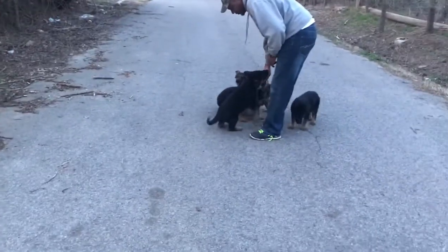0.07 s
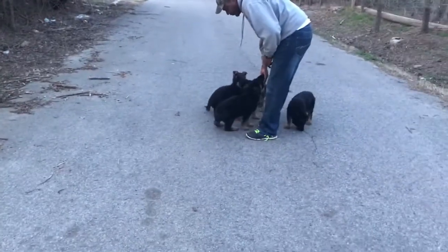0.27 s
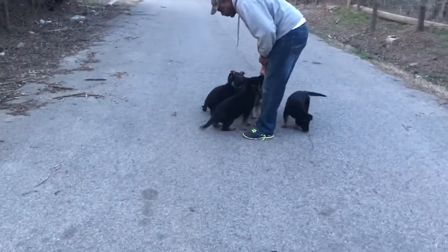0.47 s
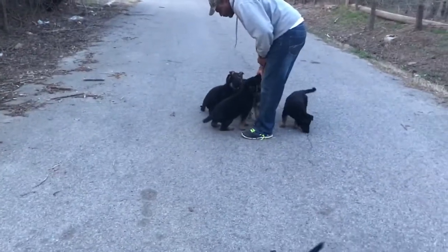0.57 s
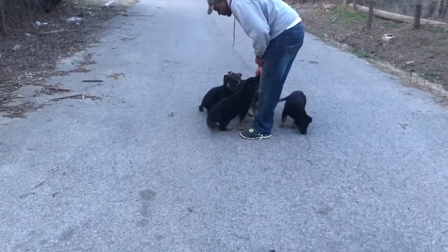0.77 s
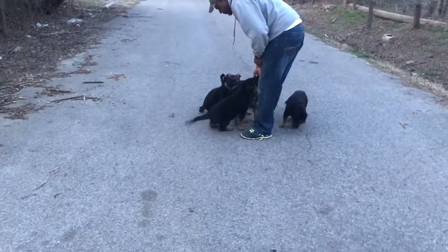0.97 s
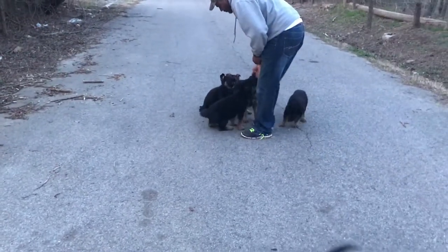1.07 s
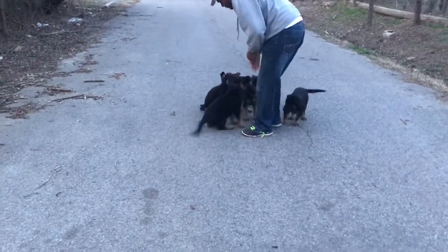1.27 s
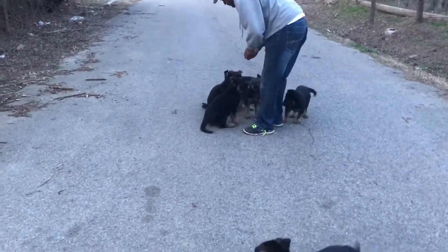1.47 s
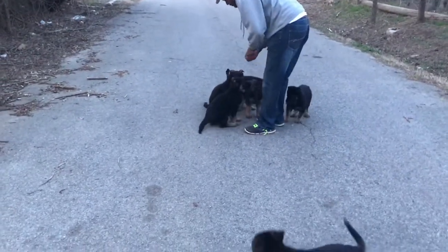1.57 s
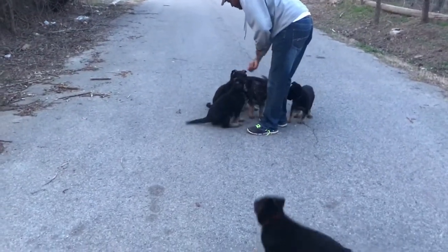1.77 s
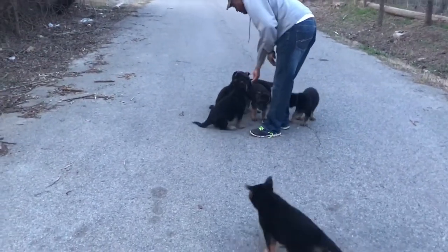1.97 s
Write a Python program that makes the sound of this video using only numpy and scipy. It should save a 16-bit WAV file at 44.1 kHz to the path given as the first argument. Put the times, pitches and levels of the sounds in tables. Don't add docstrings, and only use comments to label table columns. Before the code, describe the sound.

Short rising puppy yips and rough breathy huffs outdoors, claws ticking on asphalt over faint distant rumble

```python
import sys
import numpy as np
from scipy import signal
from scipy.io import wavfile
from scipy.ndimage import uniform_filter1d

SR = 44100
rng = np.random.default_rng(int(sys.argv[2]) if len(sys.argv) > 2 else 0)


def persist_wave(psi):
    counts = np.round(np.clip(psi, -1, 1) * 32767).astype(np.int16)
    wavfile.write(sys.argv[1], SR, np.atleast_2d(counts).T)


def gain_from_decibels(decibels):
    exponent = np.asarray(decibels, float) / 20
    return 10 ** exponent


N = 88993
PITCH_WOBBLE = .006


def rms_one(x):
    return x / np.sqrt(np.mean(x ** 2) + 1e-20)


def at_hz(points, hz):
    p = np.array(points)
    return np.interp(np.log(hz), np.log(p[:, 0]), p[:, 1])


def drift(rate_hz):
    r = np.exp(-2 * np.pi * rate_hz / SR)
    wander = signal.lfilter([1], [1, -2 * r, r * r], rng.standard_normal(N + SR))
    return rms_one(wander[SR:])


def resonate(x, hz, width_hz):
    r = np.exp(-np.pi * width_hz / SR)
    top = np.array([1, 0, -1]) * (1 - r * r) / 2
    bottom = [1, -2 * r * np.cos(2 * np.pi * hz / SR), r * r]
    return signal.lfilter(top, bottom, x + 1e-18)


def band(x, low_hz, high_hz, order=2):
    return signal.sosfilt(signal.butter(order, [low_hz, high_hz], "band", fs=SR, output="sos"), x)


def ramp(u):
    return np.sin(np.pi / 2 * np.clip(u, 0, 1)) ** 2


def gate(start, length, attack, release):
    t = np.arange(N) / SR - start
    return ramp(t / attack) * ramp((length - t) / release)


def coloured(points, patchy_db):
    edges = np.geomspace(points[0][0], min(points[-1][0], .45 * SR), 14)
    white = rng.standard_normal((2, N + SR))
    total = np.zeros(N)
    for k, (low_hz, high_hz) in enumerate(zip(edges, edges[1:])):
        level_db = at_hz(points, np.sqrt(low_hz * high_hz)) + patchy_db * drift(6.1)
        total += gain_from_decibels(level_db) * band(white[k % 2], low_hz, high_hz)[SR:]
    return rms_one(total)


def distant_floor():
    # f/Hz, level/dB
    rumble_points = [(18, -28), (30, -2), (76, -1), (202, -10.5), (309, -14.5), (607, -13), (724, -10.5),
                     (1000, -13), (1300, -38), (2200, -120)]
    # f/Hz, level/dB
    murmur_points = [(590, -6), (1000, 1), (1520, 3.5), (1850, -3), (2410, -10), (3340, -24.5), (4110, -20),
                     (4840, -24.5), (16000, -50)]
    rumble = gain_from_decibels(-46) * coloured(rumble_points, patchy_db=1.06)
    murmur = gain_from_decibels(-52.5) * coloured(murmur_points, patchy_db=1.7)
    return rumble + murmur


def leaves():
    hiss = rms_one(resonate(rng.standard_normal(N), 14000, 2800))
    return gain_from_decibels(-74.5 + 0.73 * drift(25.0)) * hiss


def trees(x):
    echo_s, echo_db = .09, -17
    tail_t60_s, tail_db = .55, -9
    t = np.arange(SR) / SR
    tail = rng.standard_normal(SR) * gain_from_decibels(-60 * t / tail_t60_s) * ramp(t / 0.1)
    tail = gain_from_decibels(tail_db) * tail / np.sqrt(np.sum(tail ** 2))
    tail[int(echo_s * SR)] += gain_from_decibels(echo_db)
    dull = resonate(resonate(tail, 1000, 800), 1000, 1600)
    bright = gain_from_decibels(-4.0) * resonate(tail, 5000, 4000)
    return signal.fftconvolve(x, dull + bright)[:N]


def paw_scuffs():
    # start t/s, length/s, level/dB
    scuff_table = [(0.028, .04, -67), (0.342, 0.036, -58), (0.46, 0.01, -54.5), (1.034, 0.058, -69),
                   (1.13, 0.08, -62.5), (1.28, .015, -65), (1.318, 0.041, -64), (1.463, .035, -65),
                   (1.482, 0.054, -60.5), (1.528, 0.019, -63), (1.76, 0.067, -74), (1.833, 0.16, -69)]
    rough = rng.standard_normal(N) * gain_from_decibels(3 * drift(150))
    grit = rms_one(resonate(rough, 16000, 3600))
    swells = sum(gain_from_decibels(db) * gate(s, length, length / 2, length / 2) for s, length, db in scuff_table)
    return grit * swells


def claw_ticks():
    # t/s, peak level/dB, lower edge f/Hz, upper edge f/Hz
    tick_table = [(.111, -55, 11000, 14500), (.221, -43, 8200, 15100), (.248, -48, 8200, 14700),
                  (0.422, -50.5, 3070, 15000), (.941, -50, 3420, 14000), (.962, -48.5, 4130, 6960),
                  (1.384, -50, 3300, 14000), (1.431, -53, 11200, 15900), (1.587, -61, 4000, 5200),
                  (1.683, -57, 7820, 16100), (1.713, -56.5, 3750, 4450), (1.716, -52.5, 7700, 15000),
                  (1.772, -56, 10000, 15500), (1.975, -56, 9800, 15700)]
    tick_t60_s = 0.014
    out, t = np.zeros(N + 600), np.arange(600) / SR
    for s, db, low_hz, high_hz in tick_table:
        i = int(s * SR)
        burst = rng.standard_normal(600) * gain_from_decibels(-60 * t / tick_t60_s)
        burst = band(burst, low_hz, high_hz)
        out[i:i + 600] += gain_from_decibels(db) * burst / np.abs(burst).max()
    return out[:N]


def huffs():
    # start t/s, length/s, pulse rate f/Hz, voice level/dB, snort level/dB
    huff_table = [
        (-.07, 0.19, 170, -41.5, -60.5),
        (0.237, 0.11, 172, -32, -59),
        (0.616, 0.14, 170, -32, -51),
    ]
    # f/Hz, width/Hz, level/dB
    chest = [(340, 60, -16), (522, 60, 0), (670, 150, -1), (1020, 220, -12), (1350, 220, -12),
             (1680, 220, -11), (2050, 300, -19)]
    # f/Hz, width/Hz, level/dB
    nose = [(2320, 790, 0), (4320, 1220, -2.2), (6260, 1250, -10.5), (8500, 1900, -20.5), (14600, 4500, -7)]
    near_lift = [-22, -8.5, 5.4]
    open_lift = [13.5, 0.5, 0.5]
    attack_s, release_s, upper_lag_s = .05, .035, .04
    jitter, hoarse = .09, .7
    lead_s, lag_s, edge_s = 0.032, 0.091, 0.06
    out, air = np.zeros(N), rng.standard_normal((2, N))
    for huff, near_db, open_db in zip(huff_table, near_lift, open_lift):
        start, length, hz, voice_db, snort_db = huff
        cycle = np.cumsum(hz * (1 + jitter * drift(70.0))) / SR
        pulses = rms_one(np.diff(np.floor(cycle), prepend=0) * gain_from_decibels(1.6 * drift(130.0)))
        puffs = air[0] * (1 + np.cos(2 * np.pi * cycle))
        source = (1 - hoarse) * pulses + hoarse * puffs

        voice = np.zeros(N)
        for k, (f, w, d) in enumerate(chest):
            ring = resonate(resonate(source, f, 1.1 * w), f, 0.93 * w) / np.sqrt(w)
            swell = gate(start, length + upper_lag_s * np.log2(f / 600), attack_s, release_s * f / 600)
            voice += (-1) ** k * gain_from_decibels(d + open_db * (f > 800)) * ring * swell
        out += gain_from_decibels(voice_db) * rms_one(voice) * np.sqrt(length * SR / N)

        snort = np.zeros(N)
        for k, (f, w, d) in enumerate(nose):
            hiss = rms_one(resonate(resonate(air[1], f, 1.08 * w), f, 1.47 * w))
            snort += (-1) ** k * gain_from_decibels(d + near_db * (f > 8000)) * hiss
        swell = gate(start - lead_s, length + lead_s + lag_s, edge_s, 2.85 * edge_s)
        out += gain_from_decibels(snort_db + 1.5 * drift(44.0)) * snort * swell
    return out


def whine():
    # t/s, pitch f/Hz, level/dB
    course = [(0, 845, -33), (.015, 903, -30), (.035, 928, -29), (.045, 945, -37), (.055, 1060, -39),
              (.07, 1095, -41), (.085, 1095, -54)]
    # multiple of the pitch, level/dB, loss/(dB per s)
    added_tones = [(.5, -19, 100), (1.5, -16, 100), (2, -7, 330), (3, -25, 250), (5, -31, 250)]
    s, hz, db = np.transpose(course)
    t = np.arange(N) / SR
    pitch_hz = np.interp(t, s, hz) * (1 + PITCH_WOBBLE * drift(40.0))
    phase = 2 * np.pi * np.cumsum(pitch_hz) / SR
    tone = gain_from_decibels(1.5 * drift(80)) * np.sin(phase)
    for multiple, d, loss_db in added_tones:
        tone += gain_from_decibels(d - loss_db * t + 4 * drift(70)) * np.sin(multiple * phase)
    return np.sqrt(2) * gain_from_decibels(np.interp(t, s, db)) * ramp((s[-1] - t) / 0.037) * tone


def yips():
    # start t/s, length/s, top pitch f/Hz, level/dB, overtone brightness/dB
    yip_table = [
        (.193, 0.155, 470.4, -34.5, 2),
        (1.088, 0.13, 461.5, -31.5, -2.5),
        (1.378, 0.14, 462.7, -32, -1),
        (1.834, 0.14, 468.5, -33, 2.5),
    ]
    # f/Hz, level/dB
    throat = [(300, -14), (400, -7), (465, 0), (600, -6), (790, -2), (930, -14), (1250, -17), (1400, -4)]
    # f/Hz, level/dB
    upper_throat = [(1400, -4), (1600, -20), (1900, -16.5), (2300, -36), (3300, -40.5), (3800, -40.5),
                    (4300, -47.5), (5200, -42)]
    start_share, rise_s = .56, .067
    sag_share, sag_s = .19, .04
    attack_s, release_s = .04, .018
    closing_db, closing_from = -20, .6
    rasp_db, breath_db = -13, -29.5
    colour = throat + upper_throat[1:]
    out, air = np.zeros(N), rng.standard_normal(N)
    breath = rms_one(band(air, 5780, 6800, order=3))
    low_rasp = resonate(resonate(air, 706, 460), 706, 460)
    high_rasp = resonate(resonate(air, 1400, 720), 1400, 720)
    rasp = rms_one(low_rasp + 0.32 * high_rasp)
    for start, length, top_hz, db, bright_db in yip_table:
        t = np.arange(N) / SR - start
        rise = uniform_filter1d(np.clip(t / rise_s, 0, 1), size=600)
        sag = sag_share * ramp(1 - (length - t) / sag_s)
        hz = top_hz * (start_share + (1 - start_share) * rise - sag + PITCH_WOBBLE * drift(44.4))
        phase = 2 * np.pi * np.cumsum(hz) / SR
        fade_db = bright_db + closing_db * ramp((t / length - closing_from) / 0.3)

        tone = np.zeros(N)
        for k in range(1, 12):
            level_db = at_hz(colour, k * hz) + 1.3 * drift(55.0)
            level_db += (k > 1) * fade_db + (k == 4) * -9
            tone += gain_from_decibels(level_db) * np.sin(k * phase + k * k)
        puffs = breath * (1 + 0.29 * np.cos(phase)) * gain_from_decibels(2.0 * drift(45.0))
        noise = gain_from_decibels(rasp_db) * rasp + gain_from_decibels(breath_db + fade_db / 2) * puffs
        out += gain_from_decibels(db) * gate(start, length, attack_s, release_s) * (np.sqrt(2) * tone + noise)
    return out


def scene():
    dogs = yips() + whine() + huffs()
    paws = claw_ticks() + paw_scuffs()
    return (dogs + trees(dogs) + paws + leaves() + distant_floor())[None]


def roll_off(x):
    return signal.sosfilt(signal.butter(12, 16120, fs=SR, output="sos"), x)


def record(dry):
    x = signal.sosfilt(signal.butter(4, 40, "high", fs=SR, output="sos"), dry)
    x = signal.sosfilt(signal.cheby2(12, 60, 16250, fs=SR, output="sos"), x)
    return roll_off(x)


dry = scene()
out = record(dry)
persist_wave(out)
```